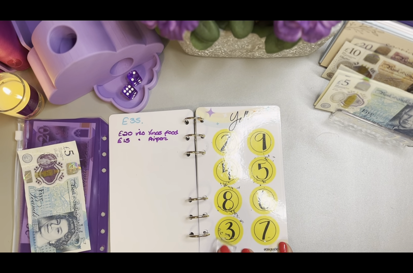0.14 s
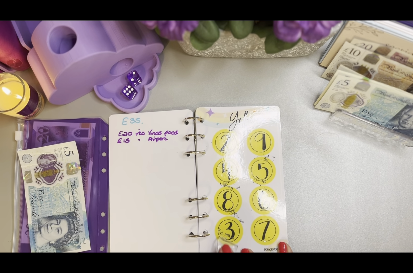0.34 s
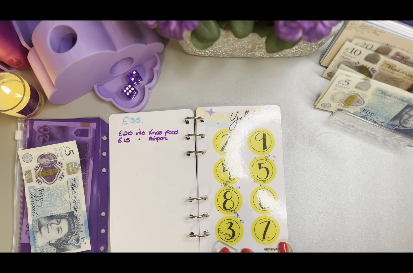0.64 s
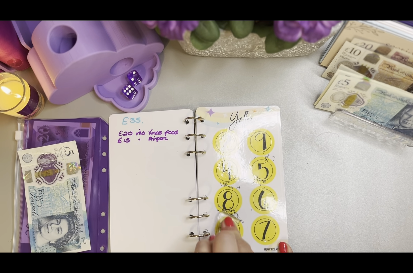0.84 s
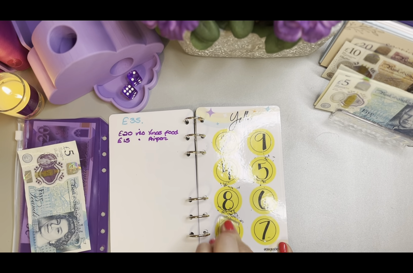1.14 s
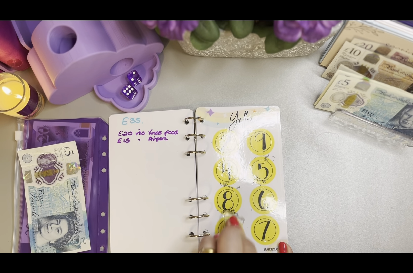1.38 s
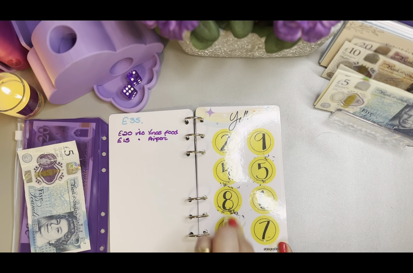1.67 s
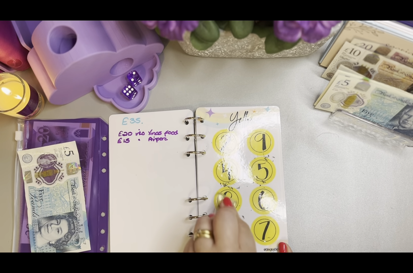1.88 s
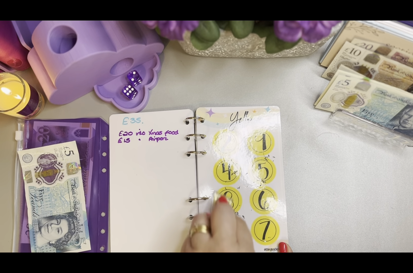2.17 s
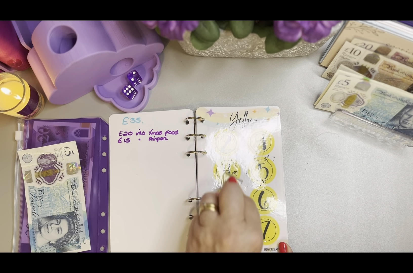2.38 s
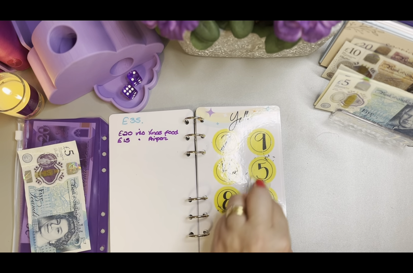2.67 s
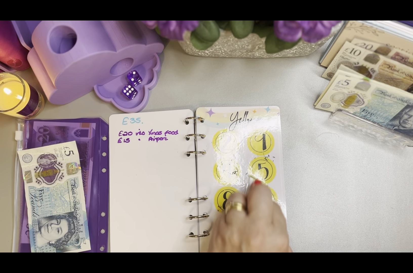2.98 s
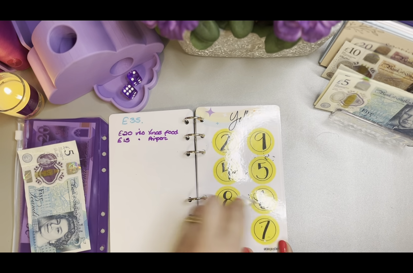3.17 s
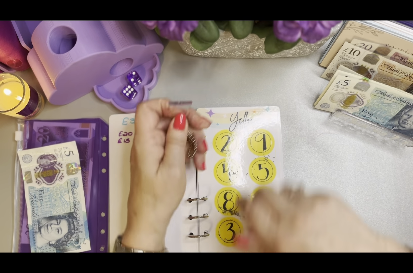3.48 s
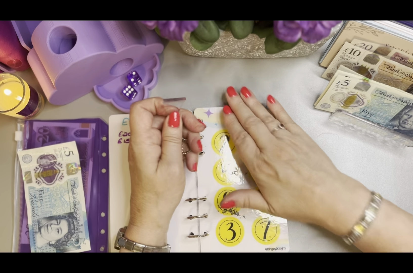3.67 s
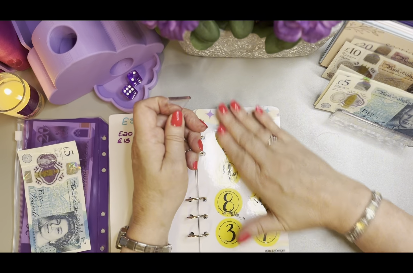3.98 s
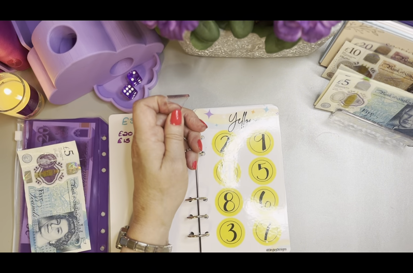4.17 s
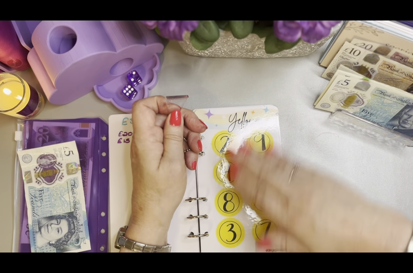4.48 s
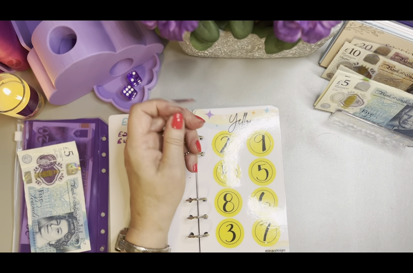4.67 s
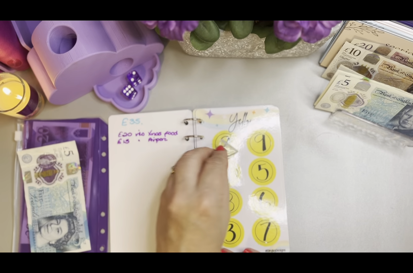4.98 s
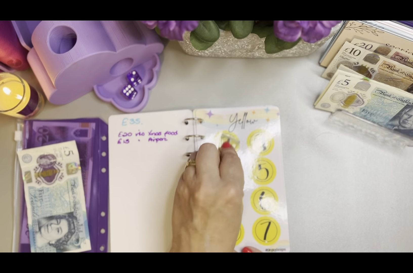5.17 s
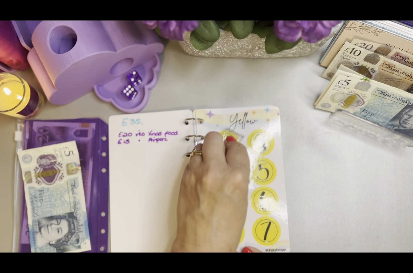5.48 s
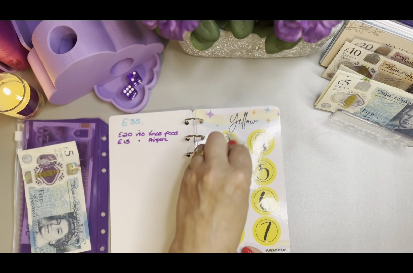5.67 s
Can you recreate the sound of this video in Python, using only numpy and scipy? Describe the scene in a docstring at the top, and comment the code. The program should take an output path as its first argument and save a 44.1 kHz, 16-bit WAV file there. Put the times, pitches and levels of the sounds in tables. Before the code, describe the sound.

A coin scratches gritty coating off paper circles in quick irregular strokes with clicks and table thuds, interrupted by one strong hand swish.

```python
"""A small, quiet room: a coin scrapes the coating off circles on a card in a ring binder on a table.
Each stroke is gritty noise with the ring of the coin's edge and snapping flakes. Clicks ring the card;
knocks also make the table boom and the pages flap. Then a hand rubs the page, sweeps the crumbs off
with one strong stroke, metal jewellery clinks, and the scraping goes on over a low rumble and hum."""
import sys
import numpy as np
from scipy import signal
from scipy.fft import rfft, irfft
from scipy.io import wavfile

SR = 44100
rng = np.random.default_rng(int(sys.argv[2]) if len(sys.argv) > 2 else 0)


def pcm_store(signal):
    """Save signal as 16-bit PCM."""
    levels = np.round(np.clip(np.atleast_2d(signal), -1, 1) * 32767)
    wavfile.write(sys.argv[1], SR, levels.astype(np.int16).T)


N = 257444

# Room rumble. Each row: frequency in Hz, relative level in dB.
RUMBLE_SPECTRUM = [(20, -17), (50, 5), (80, -6.5), (110, 1), (170, -10.5), (250, -20), (500, -27.5),
                   (1000, -29), (2000, -35.5), (4000, -43), (8000, -47), (15000, -68)]
# Steady hum. Each row: frequency in Hz, mean level in dB.
HUM_TONES = [(50, -79.5), (100, -69.5), (165, -71)]

# Coin strokes, to and fro. Each row: start in seconds, length in seconds, relative level in dB.
COIN_STROKES = [(0, 0.081, -65), (0.101, 0.077, -68.5), (.205, 0.082, -69.5), (0.32, 0.071, -69),
                (0.442, 0.095, -69.5), (0.554, 0.081, -73), (.676, 0.16, -61), (0.853, 0.13, -63),
                (0.999, 0.12, -61.5), (1.154, 0.1, -64), (1.272, .135, -61.5), (1.409, .14, -62),
                (1.578, 0.1, -71), (1.876, 0.23, -71), (2.086, 0.11, -61), (2.232, .11, -64),
                (2.367, .2, -65), (2.624, 0.16, -73.5), (2.78, 0.11, -64), (2.903, 0.11, -64.5),
                (4.682, 0.065, -68.5), (4.882, 0.07, -73), (5.025, 0.11, -60.5), (5.156, 0.22, -69),
                (5.354, 0.1, -60.5), (5.487, 0.097, -63), (5.602, 0.12, -63.5), (5.731, 0.098, -67.5)]
# Circles in scraping order. Each row: start in seconds, ring of the coin's edge in Hz, ring strength in dB.
SCRAPED_CIRCLES = [(0, 4250, 10), (1.75, 2980, 9), (2.6, 2260, 16), (2.77, 2710, -2), (4.6, 1995, 33),
                   (5.0, 2540, 12.5)]
# Scrape tilt over time. Each row: time in seconds, tilt in dB per octave.
SCRAPE_TILT = [(0, -5.5), (0.4, 0), (0.85, 2.5), (1.5, 4), (1.9, -0.5), (2.3, 4), (2.8, -2), (5.3, -1.5),
               (5.7, 0.5)]
# Scrape spectrum. Each row: frequency in Hz, relative level in dB.
SCRAPE_SPECTRUM = [(100, 0.5), (350, 6.5), (750, -4), (1400, -0.5), (2000, -7), (2700, -5), (5000, 0),
                   (7000, -5.5), (10000, -5.5), (15000, -11.5)]

# Blows that knock the binder on the table. Each row: time in seconds, click in dB, pitch of the spot in Hz,
# treble tick in dB, relative boom in dB.
BINDER_KNOCKS = [(0.009, -54, 1400, -66.5, -44.5), (0.152, -57.5, 1400, -87, -57),
                 (0.232, -51, 1850, -70, -43.5), (0.364, -59, 1310, -106, -60),
                 (0.472, -51.5, 1380, -68.5, -44), (0.598, -56, 1260, -76, -69.5),
                 (0.695, -51, 1370, -67, -41.5), (0.7967, -44, 1440, -60.5, -52),
                 (0.877, -48, 1160, -65, -40), (1.362, -38.5, 4100, -62, -47),
                 (1.46, -43.5, 1090, -60.5, -38.5), (1.992, -39, 3020, -59, -40),
                 (2.139, -50, 940, -60, -49), (2.3052, -36, 2900, -50.5, -37),
                 (2.442, -50, 1650, -58, -46.5), (2.98, -44, 1170, -67, -44.5),
                 (3.085, -64, 980, -76, -55.5), (3.23, -61, 1050, -96, -62),
                 (3.652, -56.5, 1550, -64.5, -70), (3.711, -44, 1760, -58.5, -58),
                 (4.538, -43.5, 1110, -89, -47), (4.805, -56, 1200, -75, -90),
                 (5.43, -41.5, 2430, -54, -58), (5.506, -40, 1580, -52, -41),
                 (5.692, -43, 1970, -64.5, -56.5), (5.755, -55.5, 790, -67, -45)]
# Light taps of coin and nails. Each row: time in seconds, click in dB, pitch of the spot in Hz,
# treble tick in dB.
LIGHT_TAPS = [(1.419, -58, 1420, -65.5), (1.8071, -47.5, 1930, -68), (1.9682, -43, 3170, -56),
              (2.1212, -50.5, 1570, -57), (2.2884, -40, 3270, -47.5), (2.6261, -61, 1770, -76),
              (2.6861, -57, 2250, -65), (2.8045, -45, 2700, -55.5), (3.195, -63, 1330, -84),
              (3.259, -57, 1060, -85), (3.463, -58.5, 1910, -70), (3.5843, -50.5, 2360, -60.5),
              (3.8187, -62.5, 1730, -74), (4.0743, -40, 1370, -73.5), (4.096, -41.5, 1920, -73.5),
              (4.1336, -36.5, 1760, -52), (4.5605, -44.5, 1090, -50.5), (4.573, -47.5, 1890, -69),
              (5.026, -42, 1820, -55.5), (5.075, -48, 4900, -59), (5.202, -64, 3730, -69.5),
              (5.7883, -56, 1930, -69)]
# Modes of card and coin. Each row: frequency in Hz, width in Hz, level in dB.
CARD_MODES = [(787, 1800, -3.5), (1372, 258, 0), (1894, 340, 1), (2490, 140, -0.5), (2950, 870, 0.5),
              (4200, 1000, -4.5), (5090, 190, -0.5)]
# Treble tick spectrum. Each row: frequency in Hz, relative level in dB.
TICK_SPECTRUM = [(3500, -12.5), (7000, 1), (9000, 0), (13000, -6.5), (16000, -2.5)]
# Modes of table and binder. Each row: nominal frequency in Hz, relative level in dB, t60 in seconds.
TABLE_MODES = [(59.9, -12.5, 0.38), (104.4, -1, 0.21), (144.4, 6, 0.094), (179.8, 4.5, 0.071),
               (230, -21.5, 0.18)]
# Page flap spectrum. Each row: frequency in Hz, relative level in dB.
FLAP_SPECTRUM = [(120, -28), (270, 4.5), (400, -3), (520, -7.5), (680, -10.5), (1100, -8.5), (2000, -58.5)]
# Resonances of the stack of pages. Each row: frequency in Hz, width in Hz, strength in dB.
PAGE_MODES = [(355.5, 28, 7.5), (489, 94, 8), (700, 59, 5)]

# Gentle shifts of the hand. Each row: start in seconds, length in seconds, level in dB.
HAND_RUBS = [(3.039, 0.11, -69), (3.156, 0.14, -74.5), (3.391, 0.15, -69), (3.593, 0.2, -73),
             (4.559, 0.23, -71)]
# Quick sweeps that clear the crumbs. Each row: fastest moment in seconds, run-up in seconds, peak level in dB,
# relative push on the binder in dB.
HAND_SWEEPS = [(3.385, 0.46, -64, -57), (4.12, 0.26, -32.5, -33.5), (4.567, 0.076, -48.5, -44)]
# Skin on paper. Each row: frequency in Hz, relative level in dB.
SKIN_SPECTRUM = [(30, -55), (100, -16.5), (200, 12), (300, -7.5), (500, 4.5), (750, -7.5), (1300, 0.5),
                 (2500, -1.5), (3500, -3), (5000, -4), (8000, -6.5), (15000, -11)]
# Jewellery clinks. Each row: time in seconds, level in dB.
JEWELLERY_CLINKS = [(3.371, -52.5), (3.396, -50), (3.417, -47), (3.462, -63), (5.0743, -42.5)]
# Modes of its tiny links. Each row: frequency in Hz, width in Hz, level in dB.
LINK_MODES = [(7550, 1500, -7.5), (9580, 1100, 0.5), (11900, 1500, -4), (13300, 880, -7), (15000, 780, -1)]

# Room decay. Each row: frequency in Hz, t60 in seconds.
ROOM_T60 = [(100, 0.81), (500, 0.74), (2000, 0.21), (6000, 0.24), (15000, 0.26)]
# Lead of the left microphone port. Each row: frequency in Hz, phase in radians.
PORT_PHASE = [(0, 0), (1210, -0.9), (2760, 2.2), (3880, 1.0), (5170, 1.6), (6720, 4.2), (7320, 6.0),
              (8870, 6.8), (9820, 9.4), (10900, 9.6), (11800, 12.5), (13500, 12.8), (14000, 15.6),
              (16200, 16.0)]
EDGE_HZ = 16400

# A tap rebounds at once; in a knock the coin stays on the card, longer the harder it is pressed.
# The knock contact is for the mean boom; its gain in dB changes by CONTACT_PER_BOOM per dB of boom.
TAP_CONTACT_MS, KNOCK_CONTACT_MS, CONTACT_PER_BOOM = 1.3, 2.85, 0.22
# The coin skids just before it knocks; level and tilt are relative to the click.
SKID_LEAD_S, SKID_DB, SKID_CONTACT_MS, SKID_TILT_DB_PER_OCT = 0.01, -14, 12, -4
# Click tilt: base, then change per dB of tick over click, per octave of pitch, per dB of boom.
CLICK_TILT_DB_PER_OCT, TILT_PER_TICK, TILT_PER_OCTAVE, TILT_PER_BOOM = 2.4, 0.38, 2.6, 0.25

GIVE_S = 0.0015  # the binder gives way just after the coin strikes
# Hardness of a blow; a glancing coin (more click than boom) loses GLANCE_PER_DB per dB.
COIN_HARDNESS_DB_PER_OCT, PALM_HARDNESS_DB_PER_OCT, GLANCE_PER_DB = 2.3, -24, 0.41
# Page flap: offset, share of the boom, share of the click; for a palm, offset from the push.
FLAP_DB, FLAP_PER_BOOM, FLAP_PER_CLICK, PALM_FLAP_DB = -19, 0.3, 0.41, -15.5
# A sweep swells by SWELL_DB over its run-up, pushes the binder before its fastest moment and lifts off.
SWELL_DB, LIFT_S, PUSH_LEAD_S = 50.5, 0.024, 0.01486


def amp(db):
    """Decibels to gain."""
    return 10 ** (np.asarray(db) / 20)


def evened(x):
    """Scales to rms 1."""
    return x / np.sqrt(np.mean(x ** 2) + 1e-20)


def read(points, hz):
    """Interpolates a table on a log-frequency axis."""
    point_hz, value = np.transpose(points)
    return np.interp(np.log(hz + 1), np.log(point_hz + 1), value)


def bins(x):
    """Frequencies in Hz of the spectrum of x."""
    return np.fft.rfftfreq(len(x), 1 / SR)


def octaves(hz, centre_hz):
    """Distance from a centre in octaves, limited to two."""
    return np.clip(np.log2((hz + 1) / centre_hz), -2, 2)


def peak(hz, centre_hz, width_hz, db):
    """Gain in dB of one resonance that stands out of a flat response."""
    return 20 * np.log10(1 + amp(db) / (1 + (2 * (hz - centre_hz) / width_hz) ** 2))


def colour(x, db):
    """Minimum-phase filter with the gain db on the bins of x, by folding the cepstrum."""
    cepstrum = irfft(np.log(amp(np.maximum(db, -90))), len(x))
    cepstrum[1:len(x) // 2] *= 2
    cepstrum[len(x) // 2 + 1:] = 0
    return irfft(rfft(x) * np.exp(rfft(cepstrum)), len(x))


def high_pass(x, cutoff_hz):
    """Second-order high-pass."""
    return signal.sosfilt(signal.butter(2, cutoff_hz, "high", fs=SR, output="sos"), x)


def ringing(t, hz, width_hz, db):
    """Impulse response of one mode; a wider resonance decays faster."""
    return amp(db) * np.exp(-np.pi * width_hz * t) * np.sin(2 * np.pi * hz * t)


def sized(x, db, seconds):
    """Gives x the energy of a sound that holds the level db for so many seconds."""
    return x * amp(db) * np.sqrt(seconds * SR / (np.sum(x ** 2) + 1e-20))


def add(mix, start_s, sound):
    """Adds a sound into the mix in place."""
    part = mix[max(0, round(start_s * SR)):][:len(sound)]
    part += sound[:len(part)]


def wander(length, rate_hz):
    """Random values at rate_hz, joined by straight lines; rms 1."""
    at = np.arange(length) * rate_hz / SR
    return evened(np.interp(at, np.arange(length), rng.standard_normal(length)))


def friction(length, grain_db, catch_db):
    """Countless tiny fractures, clumped into grains and slower catches."""
    clumping_db = grain_db * wander(length, 2500) + catch_db * wander(length, 170)
    return rng.standard_normal(length) * amp(clumping_db)


def hiss_level(x):
    """Rms of the part above 2 kHz."""
    return np.std(irfft(rfft(x) * (bins(x) > 2000), len(x)))


def room_tone(noise_db=-65.5, waver_db=3, apart=0.78):
    """Low rumble, partly different at each port above 300 Hz, and a hum wavering in level and phase."""
    shared, left, right = (colour(z, read(RUMBLE_SPECTRUM, bins(z))) for z in rng.standard_normal((3, N)))
    own = high_pass([left, right], 300)
    t = np.arange(N) / SR
    hum = np.zeros(N)
    for hz, db in HUM_TONES:
        level = amp(db + waver_db * wander(N, 6.2))
        hum += level * np.sqrt(2) * np.sin(2 * np.pi * hz * t + .5 * wander(N, 4.5))
    return amp(noise_db) * (shared + apart * own) / np.std(shared) + hum


def crumbs(length, per_s, spread_db):
    """Flakes of coating snap at random and ring the modes of the card; rms 1."""
    t, out = np.arange(512) / SR, np.zeros(length)
    for mode in CARD_MODES:
        snaps = rng.random(length) < per_s / len(CARD_MODES) / SR
        hits = snaps * amp(spread_db * rng.uniform(-1, 1, length))
        out += signal.oaconvolve(hits, ringing(t, *mode))[:length]
    return evened(out)


def scraping(level_db=1, grain_db=3, catch_db=1.4, ring_width_hz=800, arch=0.89,
             flakes_db=-6, flakes_per_s=200, flake_spread_db=6):
    """Strokes speed up and slow down; breaking coating rings the coin's edge and comes off in flakes."""
    out = np.zeros(N)
    for start_s, length_s, db in COIN_STROKES:
        circle = sum(start_s >= row[0] for row in SCRAPED_CIRCLES[1:])
        _, ring_hz, ring_db = SCRAPED_CIRCLES[circle]
        tilt = np.interp(start_s, *np.transpose(SCRAPE_TILT))
        grit = friction(16384, grain_db, catch_db)
        hz = bins(grit)
        gain_db = read(SCRAPE_SPECTRUM, hz) + tilt * octaves(hz, 2060)
        hiss = colour(grit, gain_db + peak(hz, ring_hz, ring_width_hz, ring_db))
        # dull strokes shed louder flakes against their hiss
        flakes = amp(flakes_db - tilt) * crumbs(len(hiss), flakes_per_s, flake_spread_db)
        way = np.clip(np.arange(len(hiss)) / SR / max(length_s, .02), 0, 1)
        speed = np.abs(np.sin(np.pi * way)) ** arch
        add(out, start_s, amp(db + level_db) * speed * (hiss / hiss_level(hiss) + flakes))
    return out


def click_tilt(click_db, spot_hz, tick_db):
    """Tilt in dB per octave: brighter with a stronger tick and a higher spot."""
    tick_part = TILT_PER_TICK * (tick_db - click_db)
    return CLICK_TILT_DB_PER_OCT + tick_part + TILT_PER_OCTAVE * octaves(spot_hz, 1570)


def contacts():
    """Every contact with the card: time s, click dB, tilt dB per octave, spot Hz, tick dB, contact ms."""
    rows = []
    for s, db, spot_hz, tick_db in LIGHT_TAPS:
        rows.append((s, db, click_tilt(db, spot_hz, tick_db), spot_hz, tick_db, TAP_CONTACT_MS))
    mean_boom_db = np.mean([knock[-1] for knock in BINDER_KNOCKS])
    for s, db, spot_hz, tick_db, boom_db in BINDER_KNOCKS:
        tilt = click_tilt(db, spot_hz, tick_db)
        press_db = boom_db - mean_boom_db
        contact_ms = KNOCK_CONTACT_MS * amp(CONTACT_PER_BOOM * press_db)
        rows.append((s, db, tilt + TILT_PER_BOOM * press_db, spot_hz, tick_db, contact_ms))
        rows.append((s - SKID_LEAD_S, db + SKID_DB, tilt + SKID_TILT_DB_PER_OCT, spot_hz,
                     tick_db + SKID_DB, SKID_CONTACT_MS))
    return rows


def clicks(rise_s=0.001, chatter_db=-24, chatter_s=0.018, spot_width_hz=350, spot_db=5):
    """Brief gritty contacts ring the card, each spot favouring its own pitch; the card chatters after."""
    out, t = np.zeros(N), np.arange(4096) / SR
    hz = bins(t)
    card_power = sum(amp(2 * db) / (1 + ((hz ** 2 - mode_hz ** 2) / ((hz + 1) * width_hz)) ** 2)
                     for mode_hz, width_hz, db in CARD_MODES)
    card_db = 10 * np.log10(card_power + 1e-12)
    card_db -= 10 * np.log10(1 + (hz / 7000) ** 6)
    for s, click_db, tilt, spot_hz, tick_db, contact_ms in contacts():
        contact = np.exp(-t * 1000 / max(contact_ms, .3))
        chatter = amp(chatter_db) * np.exp(-t / chatter_s)
        force = (1 - np.exp(-t / rise_s)) * (contact + chatter)
        grit, crack = force * rng.standard_normal((2, len(t)))
        spot_gain_db = peak(hz, spot_hz, spot_width_hz, spot_db)
        body = colour(grit, card_db + tilt * octaves(hz, 5500) + spot_gain_db)
        tick = colour(crack, read(TICK_SPECTRUM, hz))
        add(out, s, sized(body, click_db, 0.011) + sized(tick, tick_db, 0.011))
    return out


def blows():
    """Every blow on the binder, by coin or palm: time s, boom dB, hardness dB per octave, flap dB."""
    rows = []
    for s, click_db, _, _, boom_db in BINDER_KNOCKS:
        hardness = COIN_HARDNESS_DB_PER_OCT - GLANCE_PER_DB * (click_db - boom_db)
        flap_db = FLAP_DB + FLAP_PER_BOOM * boom_db + FLAP_PER_CLICK * click_db
        rows.append((s + GIVE_S, boom_db, hardness, flap_db))
    for s, _, _, push_db in HAND_SWEEPS:
        rows.append((s - PUSH_LEAD_S, push_db, PALM_HARDNESS_DB_PER_OCT, push_db + PALM_FLAP_DB))
    return rows


def table_boom(t, hardness, rise_s=0.015):
    """Decaying table modes: a soft push wakes only the main mode, a hard knock all of them."""
    spot = 1 + 0.022 * rng.standard_normal(len(TABLE_MODES))
    boom = np.zeros(len(t))
    for k, (hz, db, t60_s) in enumerate(TABLE_MODES):
        mode_db = db + hardness * abs(octaves(hz, 88)) - 60 * t / t60_s
        # neighbours start in opposite senses, so the boom swells just after the blow
        boom += (-1) ** (k + 1) * amp(mode_db) * np.sin(2 * np.pi * hz * spot[k] * t)
    return boom * (1 - np.exp(-(t / rise_s) ** 2))


def knocks(boom_trim_db=-1.0, flap_trim_db=-1, sway_trim_db=-7, flap_rise_s=0.0027, flap_s=0.018):
    """Table booms, pages flap. Returns the up-and-down motion and the sideways sway."""
    out, sway, t = np.zeros(N), np.zeros(N), np.arange(16384) / SR
    hz = bins(t)
    pages_gain_db = read(FLAP_SPECTRUM, hz) + sum(peak(hz, *mode) for mode in PAGE_MODES)
    flutter = (1 - np.exp(-t / flap_rise_s)) * np.exp(-t / flap_s)
    for s, boom_db, hardness, flap_db in blows():
        boom = table_boom(t, hardness)
        flap, sideways = (colour(z * flutter, pages_gain_db) for z in rng.standard_normal((2, len(t))))
        add(out, s, sized(boom, boom_db + boom_trim_db, 0.082))
        add(out, s, sized(flap, flap_db + flap_trim_db, 0.045))
        add(sway, s, sized(sideways, flap_db + sway_trim_db, 0.012))
    return out, sway


def hand_effort(arch=0.23):
    """Gentle rubs rise and fall in an arch; a sweep gathers speed steadily and breaks off."""
    t, effort = np.arange(N) / SR, np.zeros(N)
    for s, length_s, db in HAND_RUBS:
        way = np.clip((t - s) / length_s, 0, 1)
        effort += amp(db) * np.abs(np.sin(np.pi * way)) ** arch
    for s, run_up_s, db, _ in HAND_SWEEPS:
        drop = np.where(t < s, (s - t) / run_up_s, ((t - s) / LIFT_S) ** 2)
        effort += amp(db - SWELL_DB * drop)
    return effort


def hand(grain_db=-1.0, catch_db=1.5, crumbs_db=-5, crumbs_per_s=330, crumb_spread_db=5):
    """Skin rubs over the page and loose crumbs roll under it."""
    grit = friction(N, grain_db, catch_db)
    rub = colour(grit, read(SKIN_SPECTRUM, bins(grit)))
    rolling = amp(crumbs_db) * crumbs(N, crumbs_per_s, crumb_spread_db)
    return hand_effort() * (rub / hiss_level(rub) + rolling)


def jewellery(rattle_s=0.0057, rise_s=0.00064, hits_per_s=1500):
    """Tiny metal links rattle against each other for a moment and ring very high."""
    out, t = np.zeros(N), np.arange(2048) / SR
    shape = (len(LINK_MODES), len(t))
    for s, db in JEWELLERY_CLINKS:
        hits = rng.standard_normal(shape) * (rng.random(shape) < hits_per_s / SR)
        hits *= (1 - np.exp(-t / rise_s)) * np.exp(-t / rattle_s)
        ring = sum(signal.fftconvolve(hit, ringing(t, *mode)) for hit, mode in zip(hits, LINK_MODES))
        add(out, s, sized(ring, db, 0.0069))
    return out


def ports(x, left_db=-0.63, right_db=-0.05):
    """The page reaches the two microphone ports out of step."""
    hz, radians = np.transpose(PORT_PHASE)
    lag = np.exp(-1j * np.interp(bins(x), hz, radians))
    return np.array([amp(left_db) * x, amp(right_db) * irfft(rfft(x) * lag, N)])


def desk_echoes(x, echo_db=-11.0, lowest_hz=300, count=6):
    """Things around the binder throw back a few quick echoes; long waves pass them by."""
    short_waves = high_pass(x, lowest_hz)
    out = np.zeros((2, N))
    for port in out:
        delays_s = rng.uniform(.0006, 0.0056, count)
        for delay_s, size in zip(delays_s, evened(rng.standard_normal(count))):
            add(port, delay_s, size * short_waves)
    return amp(echo_db) * out / np.sqrt(count)


def room(x, wet_db=-14, bass_db=-10):
    """Sparse reflections, different at each port, each band dying at its own speed."""
    count = SR // 2
    echoes = rng.standard_normal((2, count)) * (rng.random((2, count)) < .06)
    echoes *= np.arange(count) > .004 * SR
    hz, t, bands = signal.stft(echoes, SR, nperseg=256)
    hz = hz[:, None]
    decay_db = -60 * t / read(ROOM_T60, hz)
    bass_cut_db = bass_db / (1 + (hz / 300) ** 2)
    tail = signal.istft(bands * amp(decay_db + bass_cut_db), SR, nperseg=256)[1]
    tail /= np.linalg.norm(tail[0])
    return amp(wet_db) * signal.fftconvolve(x[None], tail, axes=1)[:, :N]


def scene():
    """Everything on the page, heard directly, off the desk and through the room, over the room tone."""
    up_down, sway = knocks()
    page = scraping() + clicks() + up_down + hand() + jewellery()
    direct = ports(page) + np.array([sway, -sway])
    return direct + desk_echoes(page) + room(page) + room_tone()


def record(dry):
    """Band limit of the recorder: a steep linear-phase low-pass."""
    low_pass = signal.firwin(511, EDGE_HZ, window=("kaiser", 9), fs=SR)
    return signal.oaconvolve(dry, low_pass[None], "same")


dry = scene()
out = record(dry)
pcm_store(out)
```